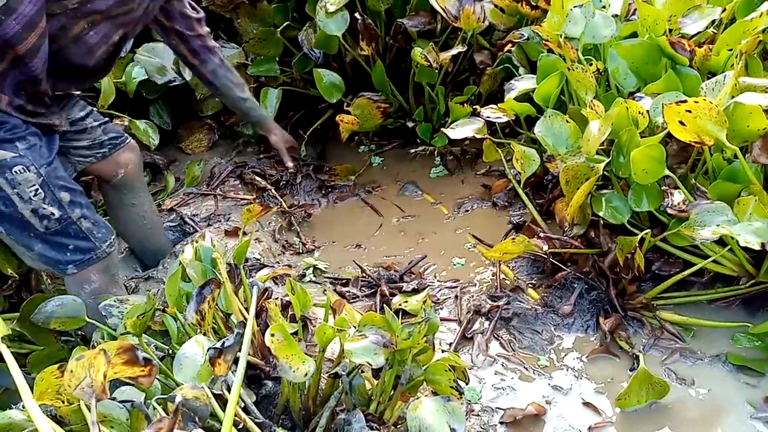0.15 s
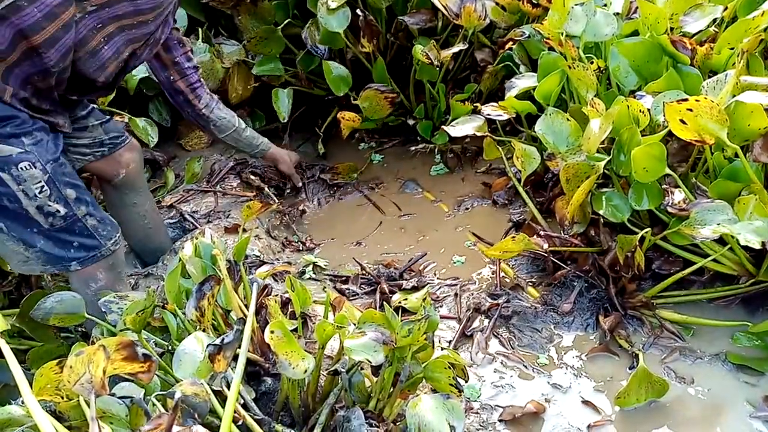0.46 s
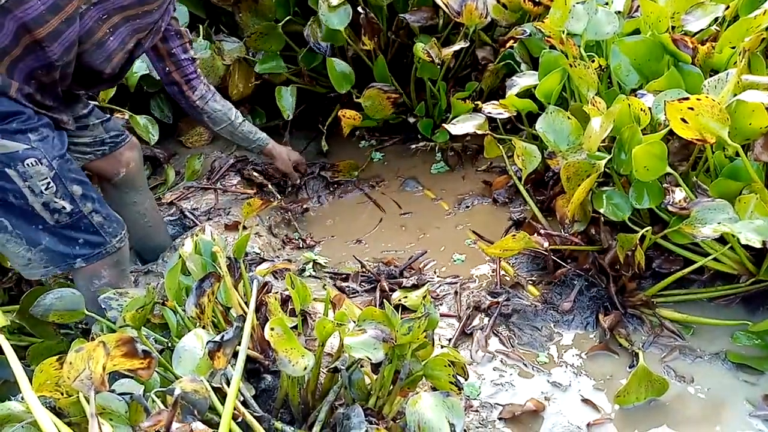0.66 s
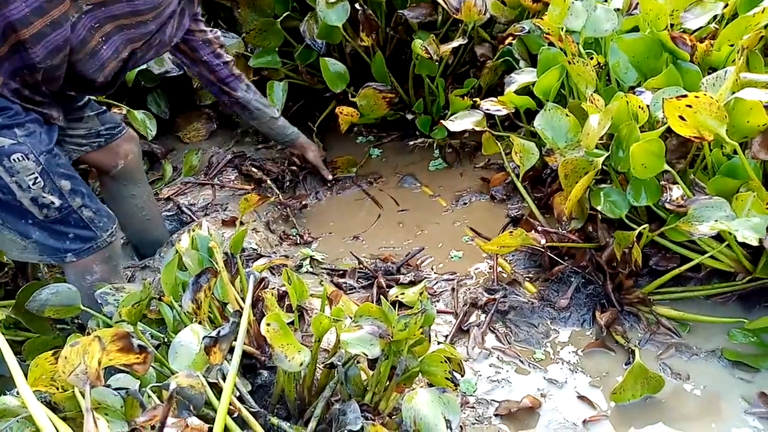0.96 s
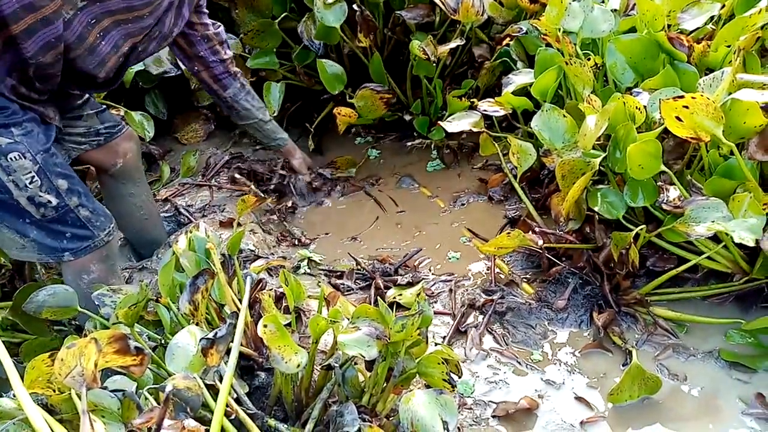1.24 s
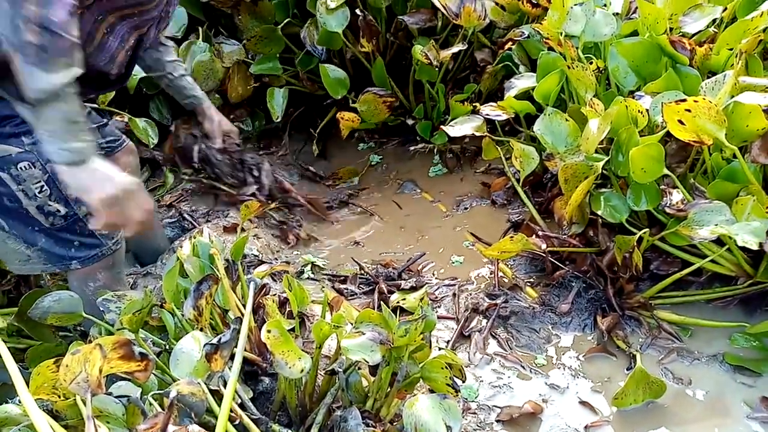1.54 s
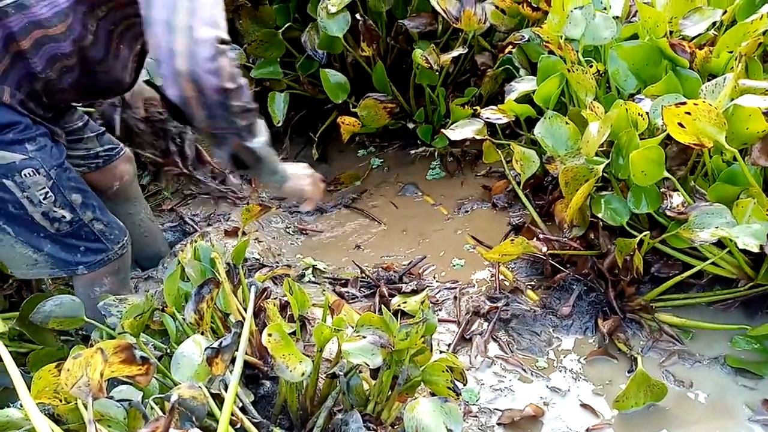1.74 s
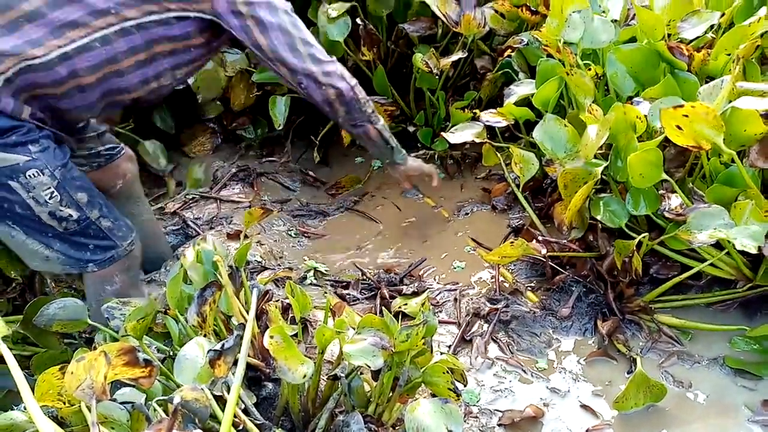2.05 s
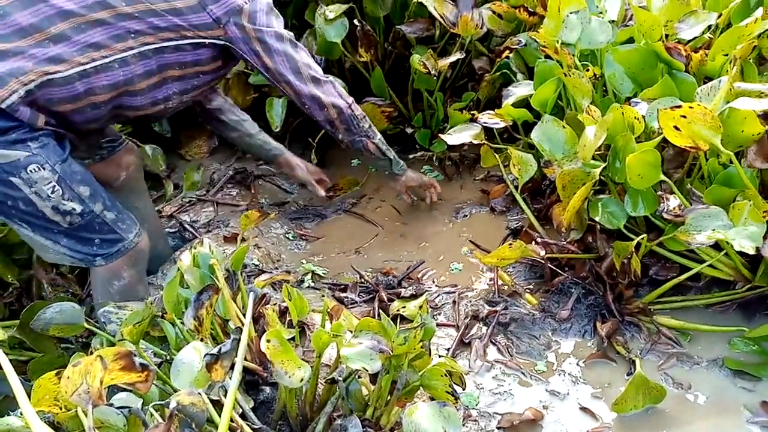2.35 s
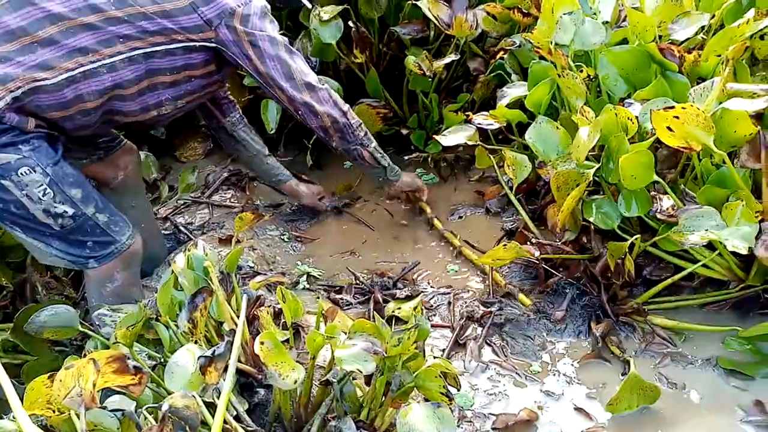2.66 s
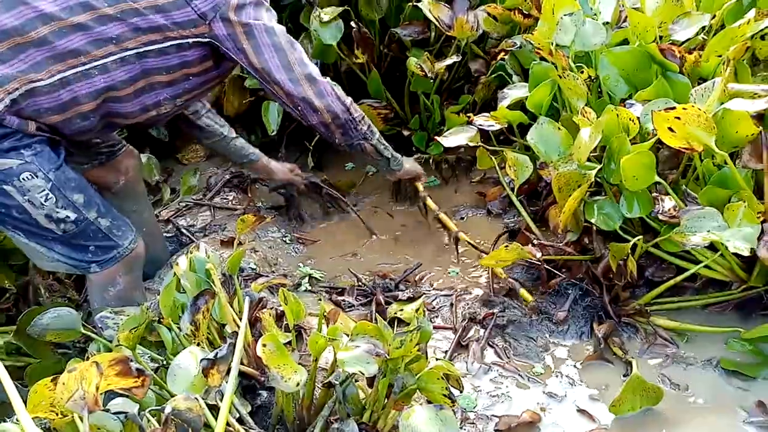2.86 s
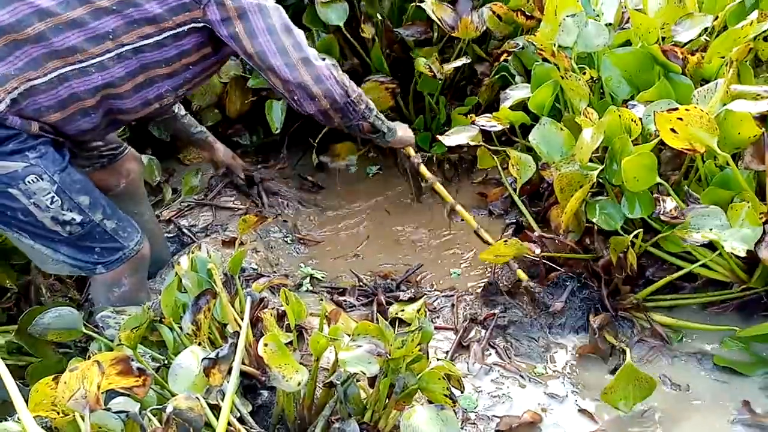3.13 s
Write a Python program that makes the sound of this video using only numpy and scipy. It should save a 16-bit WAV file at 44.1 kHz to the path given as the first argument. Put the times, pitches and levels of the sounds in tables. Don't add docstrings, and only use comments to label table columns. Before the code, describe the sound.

Hands digging in watery mud: soft drips, fizz and small wet crackles at first, stronger from 1.0 s, with gurgling and a cluster of plopping bubbles around 1.4-2.0 s. It thins after 2.4 s; fibres creak from 2.9 s, then a very loud dry snap at 3.1 s and another at 3.2 s. Behind, faint open-air hiss, distant pump thudding twelve times a second, faint clucks and chirps. Right side brighter.

```python
import sys
import numpy as np
from scipy import signal
from scipy.fft import rfft, irfft, next_fast_len
from scipy.io import wavfile
from scipy.ndimage import uniform_filter1d, map_coordinates

SR = 44100
rng = np.random.default_rng(int(sys.argv[2]) if len(sys.argv) > 2 else 0)


def linear_from_db(decibels):
    return 10 ** (np.asarray(decibels, float) / 20)


def generate_wav(sig):
    pcm = np.round(np.clip(np.atleast_2d(sig).T, -1, 1) * 32767).astype(np.int16)
    wavfile.write(sys.argv[1], SR, pcm)


N = 145530


def unit(x):
    return x / np.sqrt(np.mean(x ** 2, -1, keepdims=True) + 1e-20)


def along(points, hz):
    point_hz, value = np.transpose(points)
    return np.interp(np.log(hz + 1), np.log(point_hz + 1), value)


def curve(rows):
    time_s, *columns = np.transpose(rows)
    return [np.interp(np.arange(N) / SR, time_s, column) for column in columns]


def wobble(knots_per_s):
    knots = rng.standard_normal(int(N * knots_per_s / SR) + 4)
    return map_coordinates(knots, [np.arange(N) * knots_per_s / SR])


def filtered(x, response):
    size = next_fast_len(x.shape[-1] + 8192)
    spectrum = rfft(x, size) * response(np.fft.rfftfreq(size, 1 / SR))
    return irfft(spectrum, size)[..., :x.shape[-1]]


def coloured(x, spectrum):
    return unit(filtered(x, lambda hz: linear_from_db(along(spectrum, hz))))


def ring(hz, centre_hz, width_hz):
    damping = 1j * hz * width_hz
    return damping / (centre_hz ** 2 - hz ** 2 + damping)


def add(out, start_s, x):
    part = out[:, max(round(start_s * SR), 0):][:, :x.shape[-1]]
    part += x[..., :part.shape[1]]


def clicks(rate_per_s, spread_db, alike, size=N):
    hits = rng.random(size) < rate_per_s / SR
    right = hits * linear_from_db(spread_db * rng.exponential(size=size)) * rng.standard_normal(size)
    prompt = right * rng.standard_normal(size)
    delayed = np.roll(right, 9) * rng.standard_normal(size)
    left = alike * unit(right) + np.sqrt(1 - alike ** 2) * unit(prompt + delayed)
    return unit(np.array([left, right]))


def patchy(x, depth_db):
    z = signal.stft(x, nperseg=256)[2]
    field = uniform_filter1d(rng.standard_normal(z.shape[1:]), size=9, axis=0)
    field = uniform_filter1d(field, size=4, axis=1)
    return signal.istft(z * linear_from_db(depth_db * field / field.std()), nperseg=256)[1][:, :N]


def gurgle(stir_db, count):
    when, pitch, size, side = rng.random((count, 4)).T[..., None]
    t = np.arange(500) / SR
    hz = 750 * 2.7 ** pitch
    start = (when * (N - 500)).astype(int)
    at = (start + np.arange(500)).ravel()
    attack = 1 - np.exp(-t / .001)
    body = linear_from_db(stir_db[start] - 3.2 * np.log(size + .04)) * np.exp(-t * hz / 7) * attack
    phase = 2 * np.pi * hz * t * (1 + 8.7 * t)
    return np.array([np.bincount(at, (body * np.sin(phase + p)).ravel(), N) for p in (3 * side, 0)])


# (time [s], digging effort [dB], mud stirring [dB])
HANDS = [(0, -64.5, -81), (.15, -66, -75), (.5, -63.5, -89), (.65, -68.5, -85), (.85, -69, -77.5),
         (1.05, -61.5, -74), (1.32, -59, -80), (1.45, -56.5, -68.5), (1.7, -61.5, -67.5),
         (1.97, -55.5, -66), (2.08, -60.5, -73), (2.2, -68.5, -76), (2.33, -60, -66), (2.55, -66, -72.5),
         (2.65, -70.5, -82.5), (2.88, -68.5, -84.5), (3.05, -56.5, -69), (3.3, -63.5, -70.5)]
# (frequency [Hz], level [dB])
FIZZ = [(1000, -27), (2400, -18.5), (3200, -11.5), (4400, -8), (6400, -1), (8100, -13), (13800, -19),
        (15000, -12.5)]
# (frequency [Hz], level [dB])
MUD = [(200, -30), (400, -6), (1300, 0.5), (1850, 4.5), (2300, -1), (3500, 0), (6000, -44)]


def trickle():
    effort_db, stir_db = curve(HANDS)
    clump_db = 2.4 * wobble(32) + 0.98 * wobble(35.03) + 0.21 * wobble(100)
    fizz = coloured(patchy(clicks(9000, 1.5, 0.3), 3.2), FIZZ)
    fizz = fizz * linear_from_db(effort_db + 7 + clump_db)
    mud = coloured(patchy(clicks(6000, 1.6, 0.3), 4.5), MUD)
    mud = mud * linear_from_db(stir_db + 3.5 + 0.63 * clump_db)
    return fizz + mud + gurgle(1.66 * stir_db + 42, count=900)


# (time [s], firing rate [1/s])
PUMP_SPEED = [(0, 11.985), (1.1, 11.985), (1.3, 12.088), (3.3, 12.088)]
SURGES_DB = [1, -5.5, -26, -18, -9]
# (frequency [Hz], level [dB])
EXHAUST = [(15, -59), (25, -30), (70, -8), (139, -0.5), (268, -15), (300, -12), (480, -27), (620, -57),
           (1060, -120)]
FIRST_FIRING_S, SURGE_GAP_S, SURGE_JITTER_S = 0.00801, 0.0071, 0.00087
PUMP_DB, ROAR_DB, ROAR_SWING = -66.5, -64, 0.45


def pump():
    turns = np.cumsum(curve(PUMP_SPEED)[0]) / SR - FIRST_FIRING_S * PUMP_SPEED[0][1] + 1
    fired = np.flatnonzero(np.diff(np.floor(turns)))
    order = np.arange(len(SURGES_DB))
    chance = rng.standard_normal((len(fired), len(order)))
    delay_s = order * SURGE_GAP_S + SURGE_JITTER_S * (order + 0.14) * chance
    at = np.clip(fired[:, None] + delay_s * SR, 0, N - 1).astype(int)
    blows = np.bincount(at.ravel(), -np.tile(linear_from_db(SURGES_DB), len(fired)), N)
    centre, side = coloured(rng.standard_normal((2, N)), EXHAUST)
    roar = centre * (1 + ROAR_SWING * np.cos(2 * np.pi * (turns - .12)))
    roar = roar + 0.17 * np.array([side, -side])
    return linear_from_db(PUMP_DB) * coloured(blows, EXHAUST) + linear_from_db(ROAR_DB) * roar


# (frequency [Hz], level [dB])
AIR = [(150, -10), (300, -10), (470, -5.5), (900, -9), (2600, -20.5), (6400, 2), (8200, -29), (13800, -36),
       (15000, -10)]
AIR_DB = -69.5


def air():
    return linear_from_db(AIR_DB) * coloured(patchy(rng.standard_normal((2, N)), 0.43), AIR)


# (time [s], peak [dB], start pitch [Hz], rise over
BUBBLES = [(.045, -78, 745, 0.62), (0.069, -61.5, 1140, -0.099), (0.241, -67.5, 3210, 0.14),
           (0.427, -65.5, 1760, 0.034), (1.095, -51, 3230, .02), (1.409, -51, 2130, 0.017),
           (1.524, -58, 1180, -0.17), (1.546, -49, 1820, 0.018), (1.572, -62, 1664, 0.54),
           (1.684, -57.5, 910, 0.13), (1.686, -55, 1790, -0.15), (1.759, -61, 1480, -0.015),
           (1.796, -53.5, 867, 0.15), (1.796, -46, 1620, -0.095), (1.795, -49, 2360, -0.33),
           (1.83, -54.5, 595, -0.037), (1.845, -57.5, 710, .1), (1.861, -58, 970, 0.017),
           (1.878, -57.5, 880, -0.089), (1.928, -49, 1810, 0.066), (1.982, -61.5, 866, 0.19),
           (2.312, -55, 2450, 0.063), (2.337, -57, 897, 0.13), (2.351, -58, 1216, .35),
           (2.942, -50.5, 2940, 0.033), (3.065, -60, 2030, 0.38), (3.201, -43.5, 1650, 0.1),
           (3.261, -56, 1670, 0.03), (3.215, -54.5, 1757, 0.15), (3.27, -61.5, 1690, 0.1),
           (3.1031, -25.5, 3094, 0.15), (1.651, -66, 1190, .05), (1.738, -65, 1210, .03),
           (0.631, -73, 930, 0.49), (0.929, -68, 1270, .02), (0.969, -62, 3200, 0.17),
           (1.301, -75, 830, -0.086), (1.313, -61, 3400, 0.047), (1.365, -57, 3150, 0.11),
           (1.573, -61.5, 1210, .03), (1.81, -52.5, 1410, 0.27), (1.939, -60, 1550, 0.12),
           (1.824, -60, 2750, 0.081)]
STILL_LIFE_S, LIFE_PER_RISE_S = .007, .028


def bubbles():
    out = np.zeros((2, N))
    ragged = linear_from_db(3.5 * wobble(300))
    for s, db, hz, rise in BUBBLES:
        rise = max(rise, 0)
        life_s = STILL_LIFE_S * np.sqrt(1500 / hz) + LIFE_PER_RISE_S * rise
        t = np.arange(int(4.3 * life_s * SR)) / SR
        age = t / life_s
        phase = 2 * np.pi * hz * (t + rise * life_s / 3 * age ** 3 / (1 + age ** 2 / 3))
        shape = (1 - np.exp(-t / .0012)) * np.exp(-age ** 1.5 * 1.4)
        add(out, s, linear_from_db(db + 7) * shape * np.sin(phase + rng.uniform(0, 4.87, (2, 1))))
    return out * ragged


# (time [s], peak [dB], centre [Hz])
TICKS = [(0.0812, -55.5, 10500), (0.4783, -53, 15200), (0.8091, -55, 11800), (1.1064, -57, 15000),
         (1.1368, -52, 15100), (1.177, -48, 11400), (1.2436, -48.5, 15100), (1.3674, -55, 14500),
         (1.7429, -49, 14900), (1.922, -43, 15000), (2.1405, -53, 14900), (2.1714, -55.5, 8070),
         (2.2752, -59, 15100), (2.3136, -45, 15200), (2.3615, -58, 15200), (2.393, -61, 8180),
         (2.4444, -65, 8100), (2.4538, -54, 15000), (2.5661, -46.5, 8550), (2.652, -59, 10700),
         (2.7367, -60.5, 10200), (2.8025, -60, 15100), (2.836, -60, 15200), (2.8524, -53, 15100),
         (2.8789, -57, 15100), (2.9415, -52, 8300), (2.9534, -50, 9670), (3.021, -41, 15300),
         (3.0305, -32.5, 8300), (3.0545, -43.5, 10000), (3.1517, -36, 9500), (3.163, -36.5, 8350),
         (3.1824, -50, 14800), (3.1888, -40, 8270), (3.262, -52, 8590), (3.2934, -47, 14900)]
TICK_T60_S, TICK_DB, SIZZLE = 0.025, 6, 0.23


def ticks():
    out = np.zeros((2, N))
    t = np.arange(900) / SR
    shape = linear_from_db(-60 * t / TICK_T60_S) * (1 - np.exp(-t / .0004))
    for s, db, hz in TICKS:
        burst = rng.standard_normal((2, len(t))) * shape
        x = filtered(burst, lambda f: (ring(f, hz, 1800) + SIZZLE) / (1 + (7500 / (f + 1)) ** 6))
        add(out, s, linear_from_db(db + TICK_DB) * x / np.abs(x[1]).max())
    return out


# (time [s], peak [dB], centre [Hz])
CRACKLES = [(0.122, -46, 4160), (0.1316, -40.5, 4340), (0.2521, -45, 6140), (0.3206, -53, 4660),
            (0.4332, -44, 6000), (0.8088, -60, 6500), (1.049, -35.5, 6560), (1.0727, -44, 7500),
            (1.0814, -45.5, 7300), (1.18, -43.5, 6250), (1.3974, -40, 5640), (1.4165, -36, 5340),
            (1.436, -38.5, 6130), (1.456, -49, 6500), (1.5218, -38, 6040), (1.594, -37, 6100),
            (1.7963, -39.5, 7300), (1.9247, -36.5, 6350), (1.974, -39, 6040), (2.0543, -41.5, 6400),
            (2.3121, -41, 6230), (2.36, -48.5, 6140), (2.422, -45, 6170)]
SWELL_S = .005


def crackles():
    out = np.zeros((2, N))
    t = np.arange(1200) / SR
    swell = (t / SWELL_S) ** 2 * np.exp(2 - 2 * t / SWELL_S)
    for s, db, hz in CRACKLES:
        clump = clicks(16000, 2.56, 0.087, size=len(t))
        x = filtered(clump, lambda f: ring(f, hz, 750) + 0.054 * (f > 2500))
        add(out, s - .0018, unit(x) * linear_from_db(db - 6) * swell)
    return out


# (time [s], length [s], start pitch [Hz], end pitch [Hz], level [dB])
FOWL = [
    (.73, .25, 1780, 1580, -74),
    (.88, .2, 540, 525, -76),
    (1.09, .13, 712, 705, -71),
    (2.4, .13, 530, 530, -75),
    (2.9, .12, 590, 600, -75),
    (2.13, .07, 2750, 2690, -69),
    (.3, .035, 4700, 4150, -60),
    (1.0, .15, 1900, 1800, -73),
]


def calls():
    out = np.zeros((2, N))
    drift, sway = wobble(66), wobble(44.6)
    for s, length_s, start_hz, end_hz, db in FOWL:
        n, start = int(length_s * SR), int(s * SR)
        pitch_hz = np.linspace(start_hz, end_hz, n) * (1 + .014 * drift[start:][:n])
        swell = linear_from_db(db + 3 * sway[start:][:n]) * np.sin(np.linspace(0, np.pi, n)) ** .5
        add(out, s, (swell * np.sin(2 * np.pi * np.cumsum(pitch_hz) / SR))[None])
    return out


# (time [s], peak [dB], centre [Hz], ring t60 [s])
FIBRES = [(2.942, -36, 3000, .03), (3.0075, -33, 3600, .02), (3.0308, -21, 7400, .012),
          (3.052, -37, 4000, .04), (3.083, -33, 6800, .02), (3.152, -28, 6100, .03),
          (3.163, -26, 6100, .03), (3.19, -28, 6000, .03), (3.2615, -34, 6400, .04),
          (3.0225, -38, 6600, .04), (3.0265, -28, 6600, .02), (3.029, -29, 4800, .012),
          (3.033, -31, 7000, .06), (3.055, -33, 6300, .06), (2.988, -41, 4600, .02),
          (3.1825, -36, 6000, .008), (3.1036, -5, 5500, .012), (3.1044, -14, 3150, .02),
          (3.1052, -8, 5700, .011), (3.1066, -10, 5300, .012), (3.1084, -12, 5700, .03),
          (3.111, -24, 6400, .13), (3.2, -7.5, 5700, .008), (3.2025, -25, 5600, .045)]
# (frequency [Hz], level [dB])
SNAP = [(150, -38), (350, -19), (1000, -18), (2200, -12), (3300, -6), (5600, 0), (8500, -12), (14000, -20)]


def stem():
    out = np.zeros((2, N))
    t = np.arange(5000) / SR
    for s, db, hz, t60_s in FIBRES:
        spray = clicks(14000, 1.3, 0.28, size=len(t)) * linear_from_db(-5.5 - 60 * t / max(t60_s, .003))
        spray[:, 0] -= 1.6
        low_cut_hz = 2600 if db < -18 else 100

        def body(f):
            return linear_from_db(along(SNAP, f)) * (0.5 + ring(f, hz, 2550)) / (1 + (low_cut_hz / (f + 1)) ** 4)

        x = filtered(np.pad(spray, ((0, 0), (60, 0))), body)
        add(out, s - 40 / SR, linear_from_db(db) * x / np.abs(x[1]).max() * [[1.05], [1]])
    return out


def scene():
    return trickle() + pump() + air() + bubbles() + ticks() + crackles() + calls() + stem()


def roll_off(x):
    return signal.sosfilt(signal.butter(12, 16810, fs=SR, output="sos"), x)


# (frequency [Hz], left over right [dB])
LEFT = [(100, -2), (700, -4.5), (2500, -4), (4500, -9), (6500, -16.5), (8800, -7.5), (10500, -38),
        (12500, -76)]
RIGHT_LATE_S, TOP_HZ = 46 / SR, 15600


def record(dry):
    def microphones(hz):
        early = np.exp(1j * np.pi * hz * RIGHT_LATE_S)
        pair = np.array([linear_from_db(along(LEFT, hz)) * early, 1 / early])
        return pair / (1 + (hz / TOP_HZ) ** 150)

    return roll_off(filtered(dry, microphones))


dry = scene()
out = record(dry)
generate_wav(out)
```